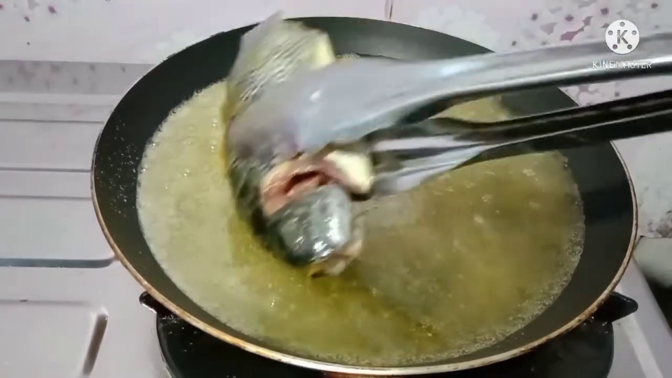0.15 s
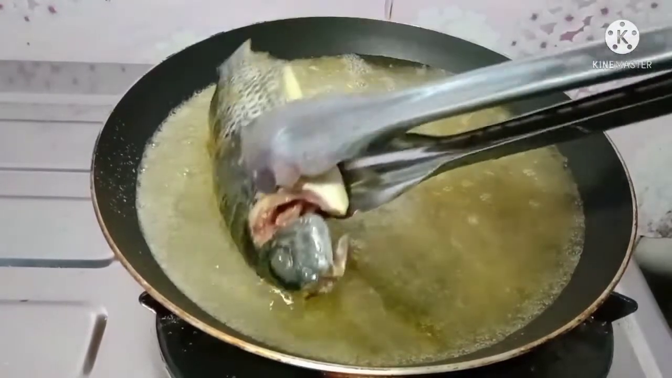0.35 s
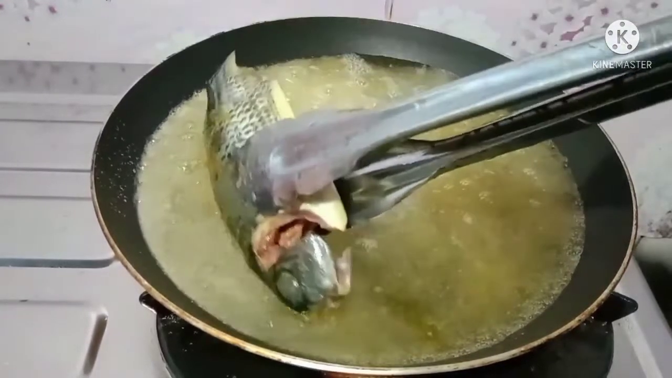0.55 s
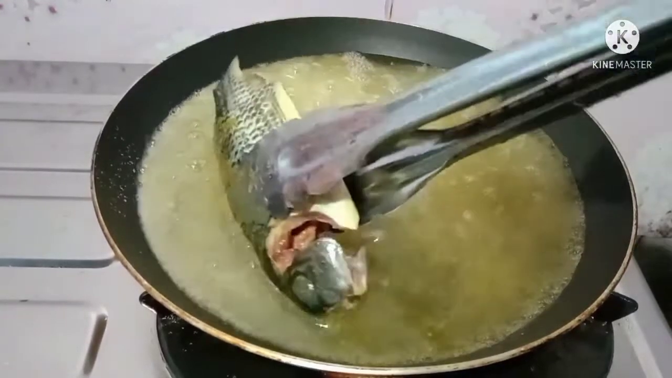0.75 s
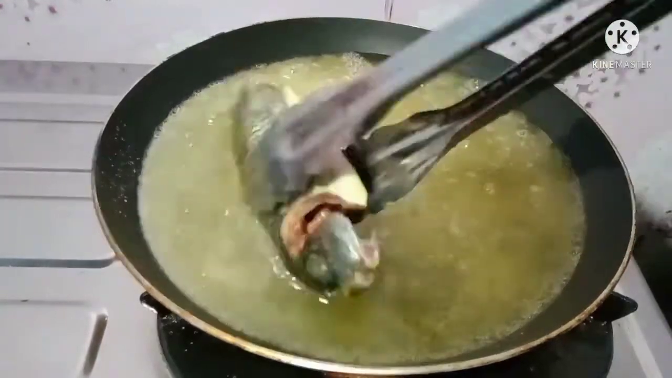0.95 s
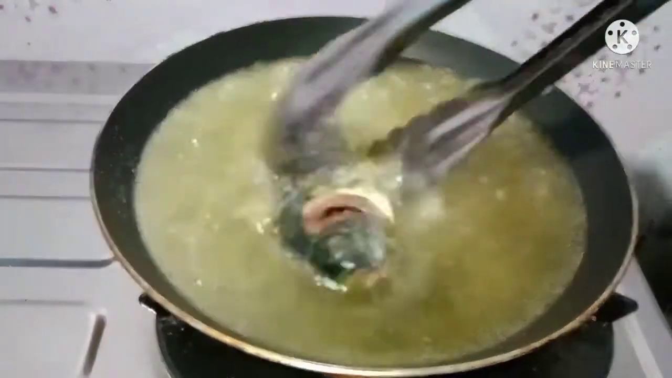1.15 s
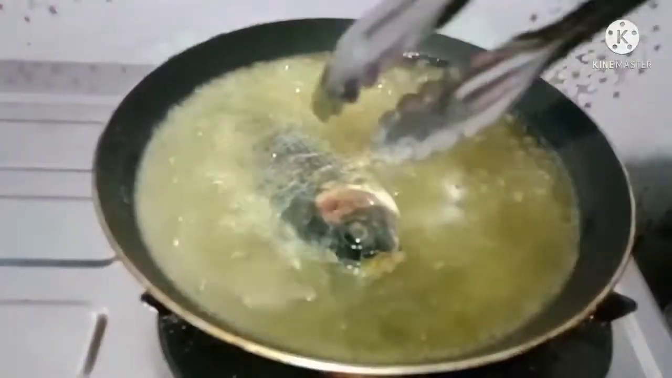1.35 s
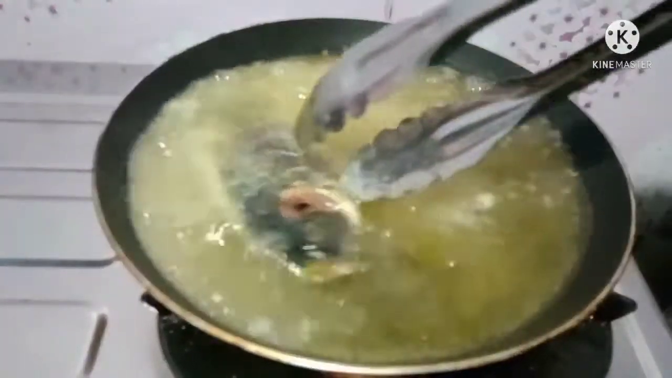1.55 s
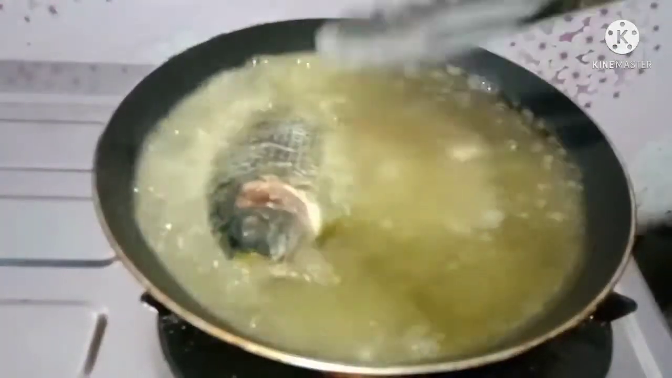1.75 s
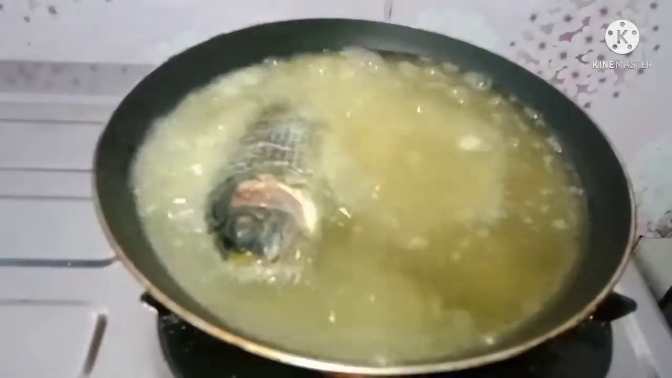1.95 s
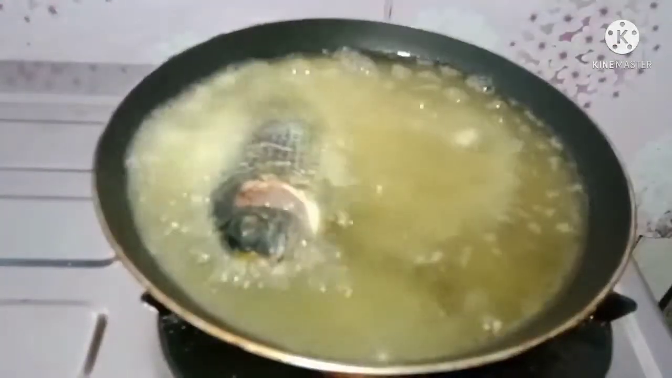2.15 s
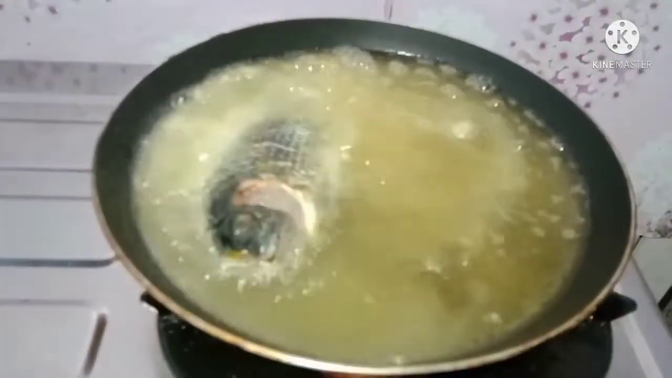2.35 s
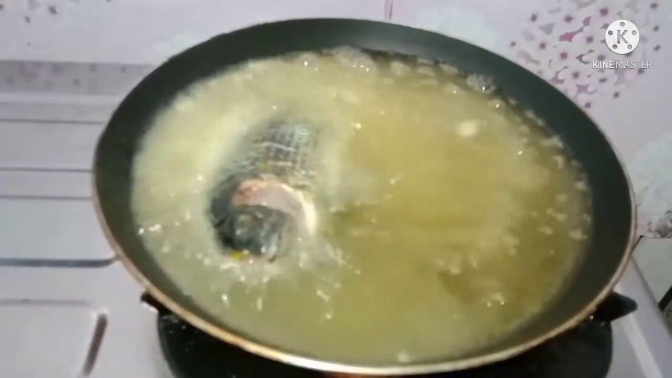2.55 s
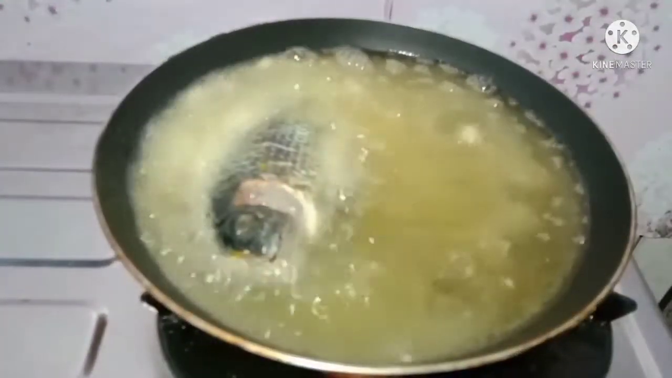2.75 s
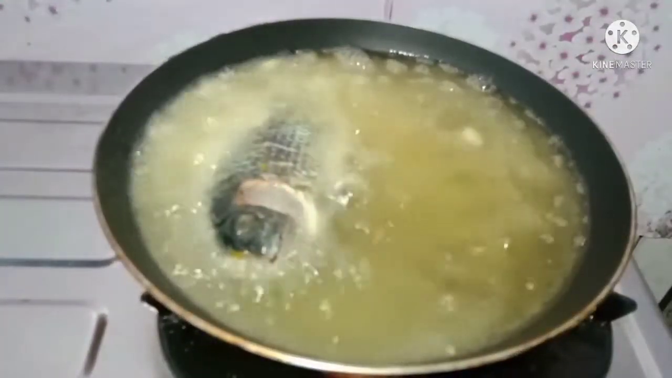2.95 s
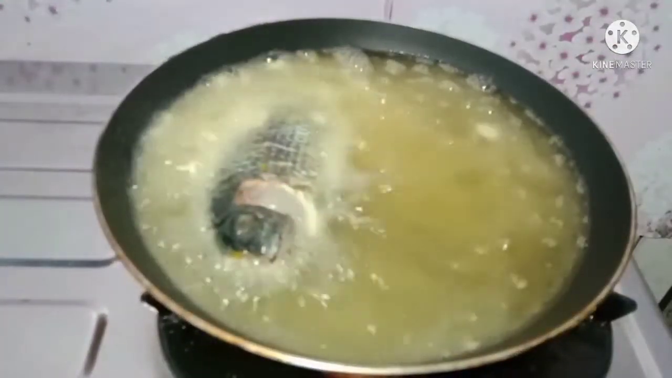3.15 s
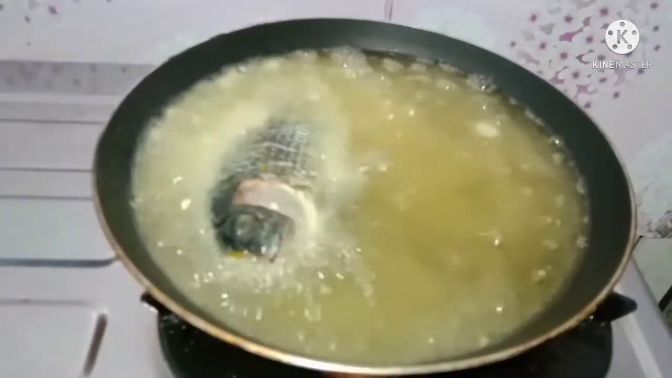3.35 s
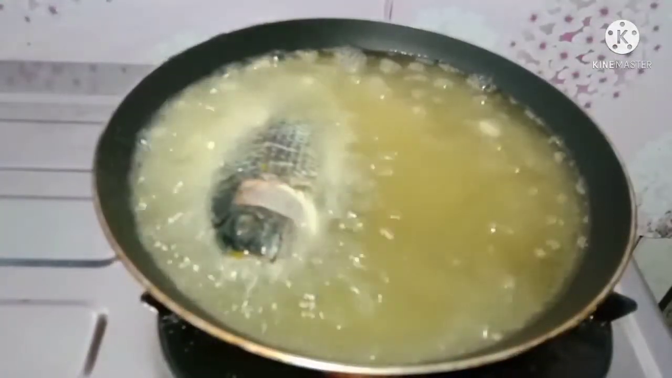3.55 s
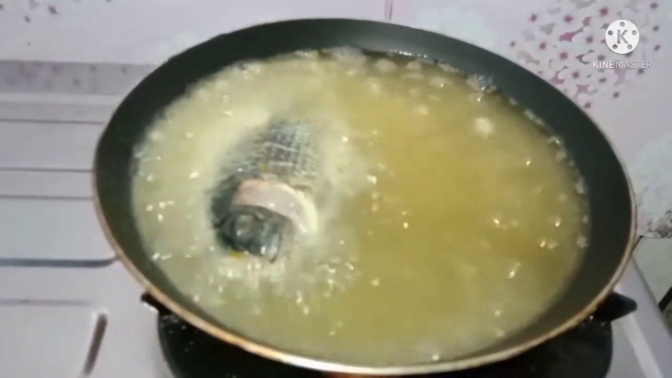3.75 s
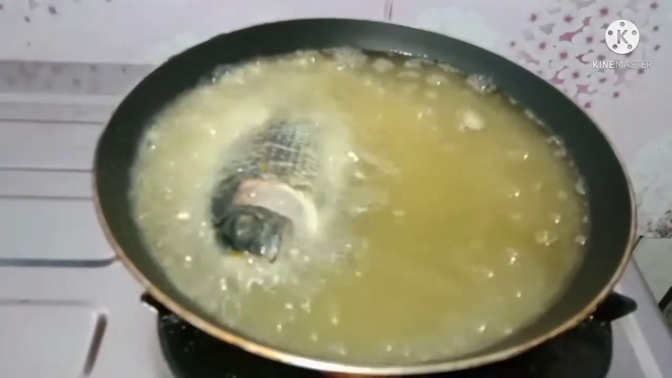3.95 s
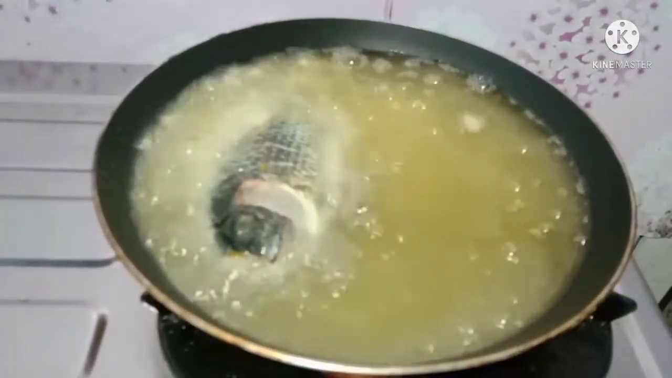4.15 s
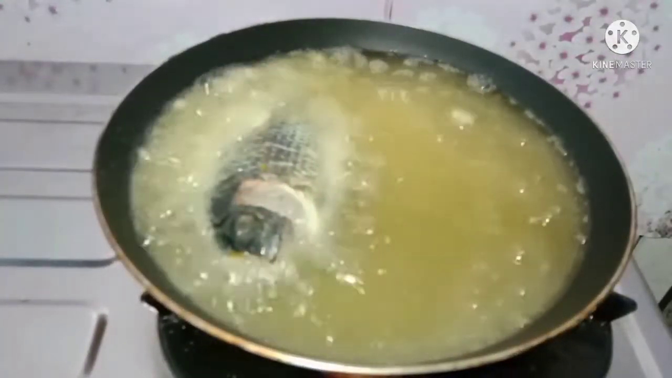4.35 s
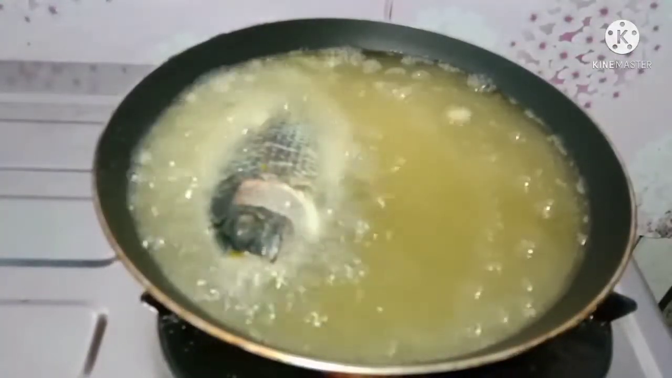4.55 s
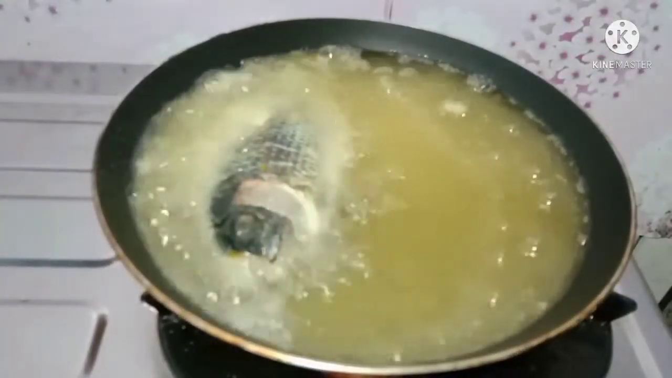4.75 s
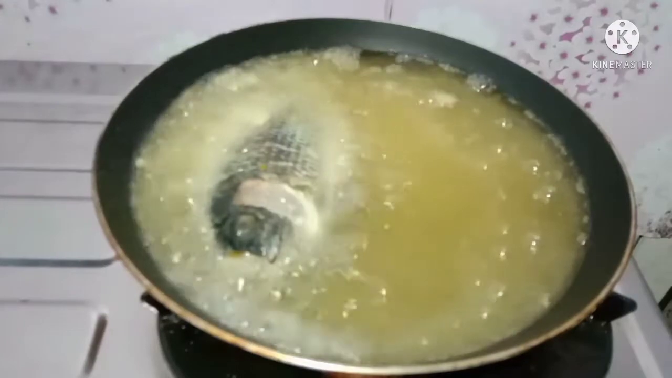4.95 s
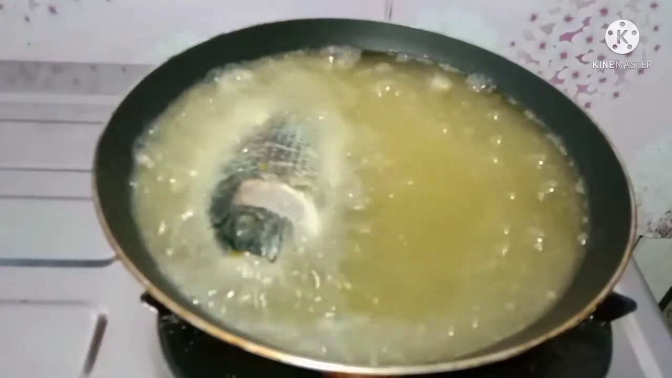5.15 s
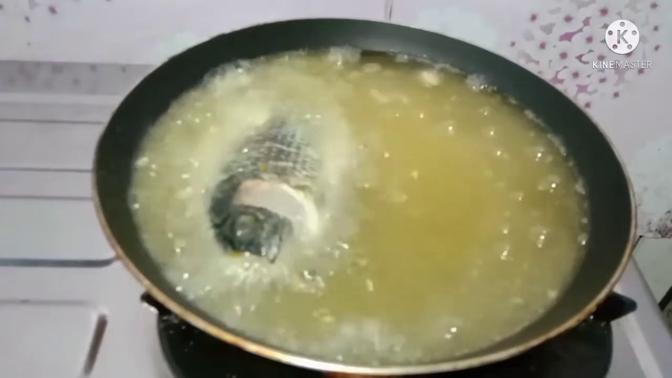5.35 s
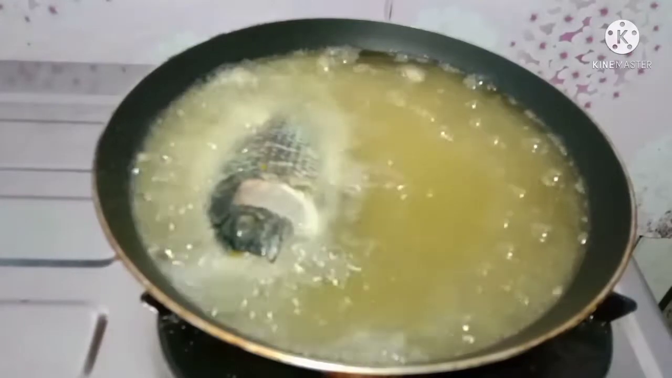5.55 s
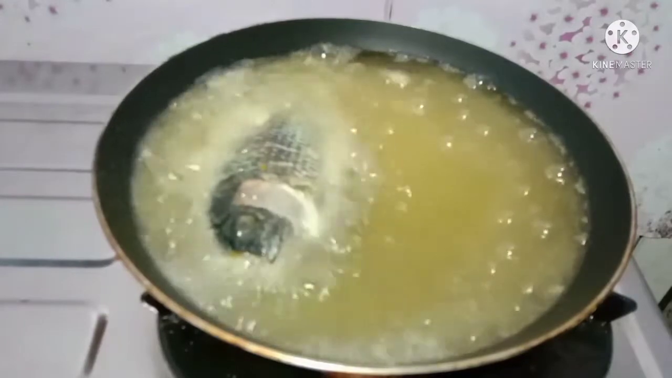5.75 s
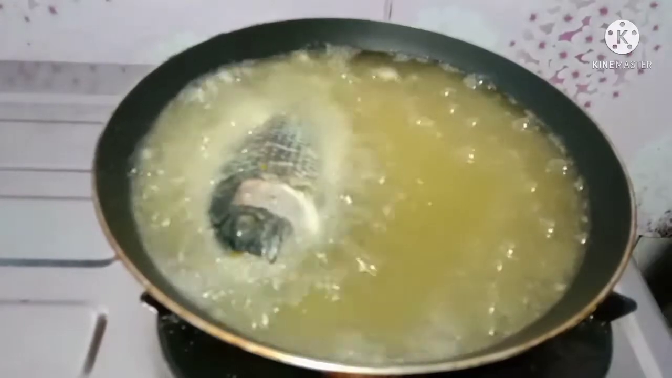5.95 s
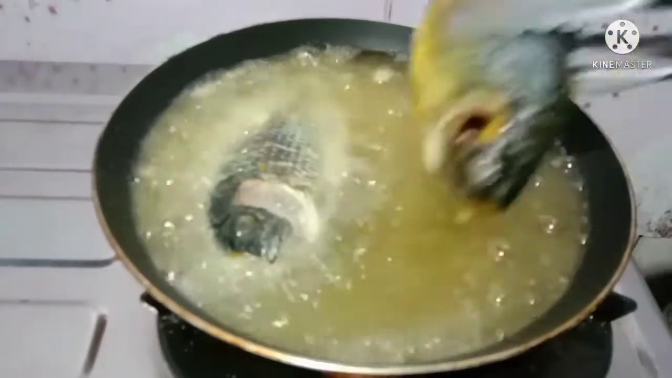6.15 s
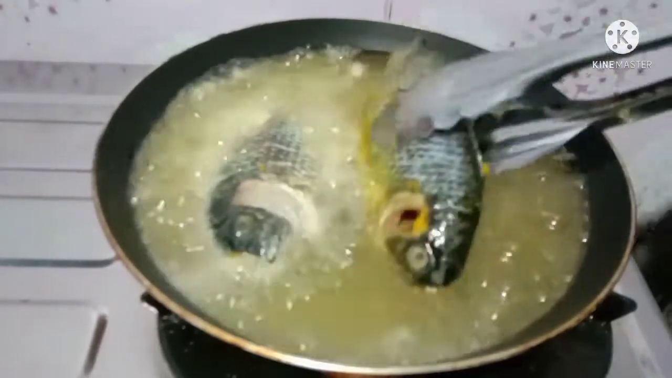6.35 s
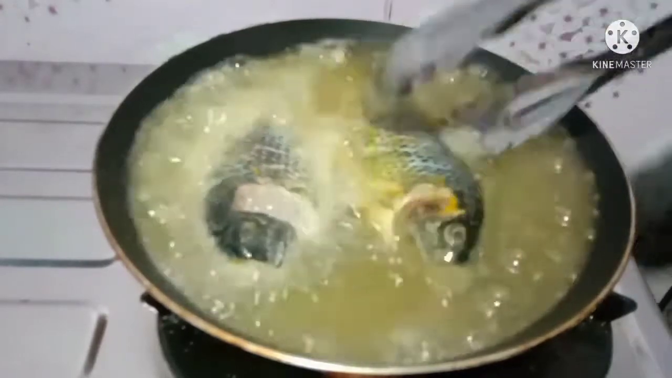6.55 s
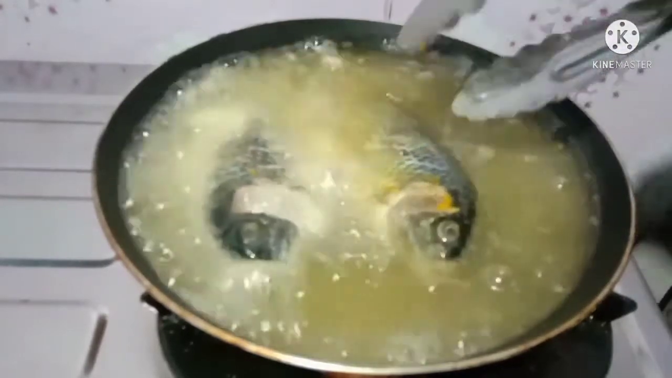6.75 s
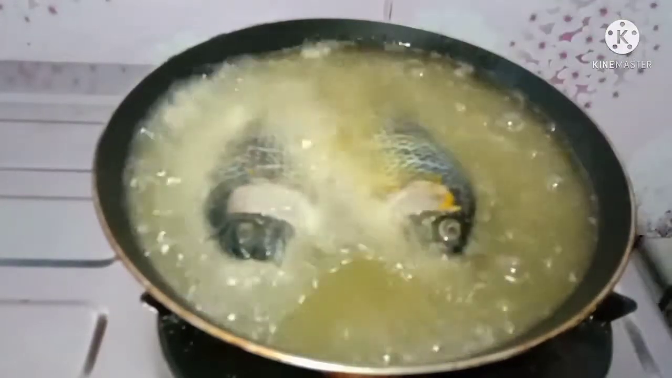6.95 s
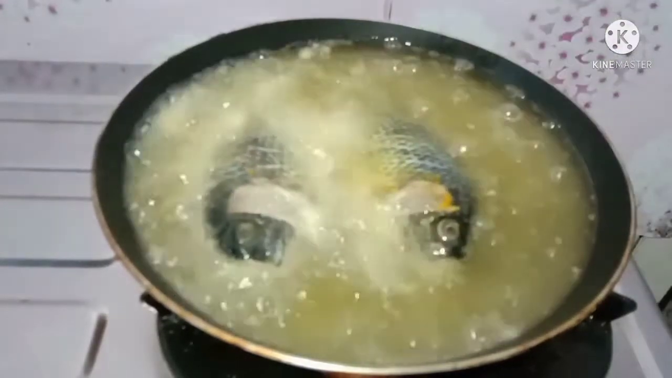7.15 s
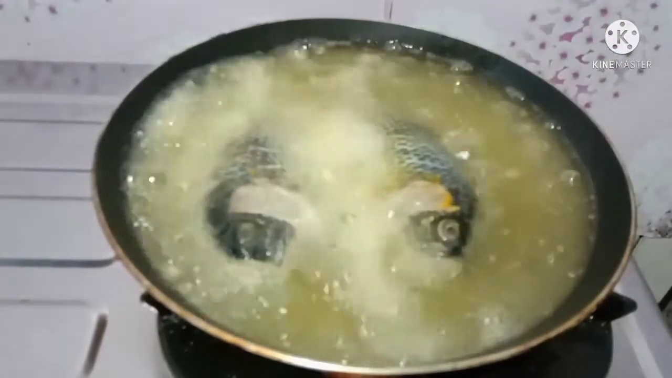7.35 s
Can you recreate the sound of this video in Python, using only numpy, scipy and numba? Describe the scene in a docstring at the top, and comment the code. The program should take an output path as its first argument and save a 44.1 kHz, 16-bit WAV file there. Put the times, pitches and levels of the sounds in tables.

```python
"""At a gas stove, close up: a fish goes into a pan of hot oil. Two scenes, mono.
First, soft low bumps sound, the gas hisses and the wet skin starts to tick and fizz.
Then steam bubbles of all sizes burst in a steady sizzle, oil spits, bigger pops ring the pan
and a faint hum stays underneath. Each bubble is a decaying sine that rises a little in pitch."""
import sys
import numpy as np
from scipy import signal
from scipy.fft import rfft, irfft, next_fast_len
from scipy.io import wavfile
from scipy.ndimage import uniform_filter1d
from numba import njit

SR = 44100
rng = np.random.default_rng(int(sys.argv[2]) if len(sys.argv) > 2 else 0)


def bounce(signal):
    """Save signal as a 16-bit WAV file at the path given by the first command-line argument."""
    frames = np.transpose(np.atleast_2d(signal))
    limited = np.clip(frames, -1, 1)
    pcm = np.round(limited * 32767).astype(np.int16)
    wavfile.write(sys.argv[1], SR, pcm)


N = 325899
TIME_S = np.arange(N) / SR
SCENE_CHANGE_S = 0.873

# six bubble sizes, fine to coarse: low_hz, high_hz, base_cycles, scatter_db, clump_db
BUBBLE_SIZES = [(9130, 15800, 14, 2.25, -0.1), (4986, 9120, 15.4, 1.5, 1), (2900, 4800, 14, 0.5, 0.8),
                (1910, 3000, 21.5, 1, 1.2), (783, 2010, 24, 1.1, 1.07), (428, 800, 18, 2, 3.5)]
# like-sized bubbles boil up: centre_s, lift_db, centre_hz, half_length_s
SURGES = [(.495, 4, 3000, .012), (0.5, 14, 13000, .03), (.55, 19, 3200, 0.018), (0.697, 5, 12000, 0.06),
          (0.778, 6, 3500, 0.078), (0.844, 2.5, 1100, 0.023), (0.945, 2, 6500, 0.023),
          (1.217, 2, 5500, 0.021), (1.295, 2.5, 2600, 0.14), (1.86, 5, 4800, 0.079),
          (2.012, 5, 5500, 0.011), (2.073, 5.5, 4200, 0.023), (2.177, 3, 4460, 0.021),
          (2.363, 3, 2500, 0.041), (3.15, 0, 4500, 0.026), (3.275, 4, 2500, 0.039),
          (3.997, 4.5, 2190, 0.025), (4.08, 2.5, 5500, 0.011), (4.474, 5.5, 2500, 0.025),
          (5.176, 6.5, 2180, 0.014), (6.604, 6.5, 2600, 0.011), (7.11, 4, 5070, 0.15),
          (7.276, 1, 7000, 0.022)]
# sizzle drift: time_s, fine_db, coarse_relative_db
FRY_DRIFT = [(0.96, -30, -15), (1.07, -30, -18.5), (1.3, -31, -15.5), (1.41, -29.5, -19.5),
             (2.07, -31, -16), (2.18, -29.5, -18.5), (4.18, -32, -13.5), (4.43, -33, -12),
             (5.04, -30.5, -15), (5.29, -31, -13), (6.17, -30, -15), (6.62, -31.5, -15), (7.23, -29, -14.5),
             (7.39, -28.5, -18)]
# sizzle onset per size: start_s, depth_db, rise_s, offset_db, coarse_share
FRY_ONSETS = [(0.935, 16.5, 0.0025, 0.48, 0.06), (0.905, 31, 0.016, -5, 0.38),
              (0.99, 10, 0.014, -9.5, 0.91), (0.91, 9, .012, -6, 1), (0.92, 4, .012, -8.5, 1),
              (1, 22, .03, -28, 0.91)]
# sizzle spectrum: freq_hz, gain_db
FRY_SPECTRUM = [(260, -52), (450, -29.5), (1110, -23.5), (1270, -17), (1410, -21), (1560, -14.5),
                (2400, -13.5), (2620, -15.5), (3270, -10), (4270, -15), (6850, -6.5), (8180, -12.5),
                (11200, 1.5), (13500, -6.5), (15500, -17)]
# sizzle drops and creeps back: start_s, gain_db, recovery_s
LULLS = [(1.965, -3, .015), (2.022, -3.5, 0.05), (3.02, -7, 0.015), (3.393, -10, 0.013),
         (4.03, -3.5, 0.016), (4.43, -3, .03), (4.585, -8, 0.0066), (4.815, -7, 0.013),
         (5.574, -11.5, 0.013), (5.856, -11, 0.0086), (6.556, -5, 0.029)]
# sharp oil spits: start_s, level_db, pitch_hz
SPITS = [(.8725, -29, 11600), (0.9407, -32, 7300), (0.9897, -15, 6820), (1.108, -21, 7250),
         (1.222, -15, 7160), (1.319, -24, 6780), (1.4364, -15.5, 7000), (1.5404, -19, 7000),
         (1.598, -20, 6980), (1.7309, -20, 5450), (1.767, -23, 7300), (1.8347, -21, 7210),
         (1.9385, -22, 5560), (2.0412, -31, 6500), (2.058, -18, 6660), (2.37, -21, 7130),
         (2.671, -25, 7140), (2.762, -20, 6100), (3.1644, -23, 7300), (3.3148, -25, 6090),
         (3.4989, -20, 6830), (3.5403, -22, 7340), (3.594, -20, 5640), (3.672, -20, 6660),
         (4.1906, -37, 6730), (4.9736, -20, 7350), (5.3003, -31, 6100), (5.3585, -14, 9050),
         (5.469, -18, 7330), (5.5847, -24, 7630), (5.6515, -24, 7340), (5.778, -17, 6800),
         (6.3794, -23, 7820), (6.605, -28, 3720), (7.024, -19, 6530), (7.0514, -32, 6790),
         (1.3959, -17, 11700), (1.9417, -15, 11900), (2.455, -22, 6500), (2.497, -27, 7500),
         (2.629, -19, 9000), (2.715, -17, 9000), (2.784, -31, 7000), (4.5777, -19, 10700),
         (5.4492, -29, 11000), (5.903, -22, 7000)]
# deeper pops: start_s, base_db, pitch_hz
POPS = [(0.986, -28, 2440), (1.286, -21.5, 2460), (1.5536, -25, 2400), (1.5916, -27, 2670),
        (1.865, -24, 2480), (1.916, -28, 2690), (1.9785, -16.5, 2520), (2.197, -28, 2780),
        (2.73, -27, 2860), (2.76, -24, 2600), (3.097, -28.5, 2600), (3.1416, -29, 2460), (3.448, -25, 2760),
        (3.546, -22, 3140), (3.664, -22, 2720), (3.726, -28, 2720), (3.7647, -23, 2680),
        (3.788, -24.5, 2560), (4.0013, -25, 1860), (4.47, -29, 2680), (4.5195, -24, 2000),
        (5.135, -27, 2700), (5.1675, -22.5, 2490), (5.3006, -24.5, 2780), (5.3785, -25, 2530),
        (5.4166, -29, 2550), (5.4575, -23.5, 2250), (5.563, -21.5, 2680), (5.644, -32, 2410),
        (5.949, -32, 2700), (6.093, -28, 2580), (6.275, -25.5, 2240), (6.307, -25, 2340),
        (6.329, -25, 2500), (6.36, -33, 2500), (6.4542, -22, 2340), (6.461, -24.5, 2330),
        (6.55, -26.5, 2630), (6.5915, -28, 1980), (6.606, -26, 1950), (6.648, -26.5, 1910),
        (4.0587, -31, 2620), (5.61, -29, 2960), (5.7144, -33, 2950), (5.897, -27, 1900),
        (6.8987, -26, 2360), (7.017, -28, 1800), (7.1966, -33, 2600), (7.272, -30, 2400)]
# large bubbles: start_s, level_db, pitch_hz
GURGLES = [(1.985, -49, 824), (2.479, -55, 1060), (2.76, -43, 1130), (3.424, -55, 820), (3.45, -56, 396),
           (3.764, -46, 1080), (3.953, -45, 1020), (3.978, -51, 850), (4.469, -47, 1090),
           (4.508, -50, 1040), (5.136, -54, 638), (5.318, -54, 770), (5.37, -48, 990), (5.713, -52, 880),
           (6.324, -49, 835), (6.387, -50, 820), (6.461, -57, 845), (7.039, -55, 610), (7.169, -58, 1040)]
# pan resonances: centre_hz, width_hz, lift_db
PAN_MODES = [(823, 38, 4), (2100, 126, 1.5), (3720, 50, 4.5), (4300, 32, 6.5), (2920, 63, 3.5),
             (3296, 53, -5.5), (11370, 320, -0.5), (11360, 200, -4.5), (13140, 370, 4.5),
             (13650, 250, -0.5)]
# main pan ring, sinking as the oil settles: time_s, pitch_hz, lift_db
PAN_MAIN_MODE = [(.9, 2720, 7.5), (1.6, 2640, 10.5), (2.15, 2680, 9.5), (2.4, 2680, 11.5), (3.0, 2616, 11),
                 (3.6, 2690, 7.5), (4.4, 2600, 9.5), (5.4, 2640, 6), (6.2, 2620, 8), (7.39, 2570, 4.5)]
# first fizz per size: start_s, depth_db, rise_s, full_db
TOUCH_ONSETS = [(.46, 21.5, 0.19, -49), (.46, 32, 0.069, -50), (.47, 47, 0.17, -50), (.58, 36, 0.13, -51),
                (.63, 35, 0.04, -50.5), (.72, 37, 0.028, -57.5)]
# first fizz spectrum: freq_hz, gain_db
TOUCH_SPECTRUM = [(260, -70), (450, -46), (587, -16), (701, -21), (916, -5), (1650, -7), (2260, -21),
                  (2470, -13), (2620, -17), (2950, -11), (5490, -11), (6650, -11.5), (7710, -27),
                  (11500, -29), (13600, -29), (14400, -14), (15500, -11.5)]
# wet skin ticks: start_s, base_db, pitch_hz, edge_db, edge_hz
TICKS = [(0.4728, -51, 6450, -51, 10500), (.489, -61, 3300, -60, 6000), (0.4956, -44, 5700, -40, 11500),
         (0.5266, -43, 5630, -40, 15000), (0.544, -37.5, 5430, -43, 11000), (0.587, -38, 5100, -55, 14300),
         (0.631, -41, 5140, -36, 12500), (0.6824, -46, 5660, -40, 14400), (0.7018, -43, 6590, -40, 9500),
         (0.728, -40, 5700, -42, 13200), (0.761, -32, 5630, -33, 9200), (0.772, -32, 5940, -48, 14200),
         (0.8114, -38.5, 6450, -39, 8600), (0.8647, -31, 5860, -42, 11500)]
# gas hiss spectrum: freq_hz, gain_db
GAS_SPECTRUM = [(240, -14), (400, -3), (425, -16), (913, -7), (1870, -17.5), (2020, -2), (2180, -28),
                (3450, -17), (4150, -39), (5720, 5.5), (8520, -14), (12500, -27), (15500, 0)]
# soft bumps: peak_s, level_db, pitch_hz, rise_s, fade_s
BUMPS = [(.004, -46.5, 190, 0.022, 0.006), (.025, -51, 150, 0.01, 0.013), (.012, -54.5, 290, 0.028, 0.016),
         (.015, -64, 495, 0.0097, 0.013), (.085, -59, 70, 0.025, 0.036), (0.129, -72, 335, 0.047, 0.059),
         (.186, -63, 115, .02, 0.02), (.272, -53.5, 134, 0.016, 0.054), (.38, -68, 105, .02, .02),
         (.48, -62, 115, .015, .015), (.518, -57, 110, 0.019, 0.011), (.585, -59, 116, 0.013, 0.013),
         (.645, -64, 112, .012, .012), (.7, -67, 122, .014, 0.014), (.758, -61, 108, 0.024, 0.026),
         (.858, -65, 115, 0.013, .014)]
# rumble spectrum: freq_hz, gain_db
RUMBLE_SPECTRUM = [(15, -52), (25, -23), (43, -17), (128, -4), (207, -10), (263, -20), (339, -26),
                   (403, -29), (430, -25), (600, -27), (780, -37), (1320, -120)]
# low noise swells: peak_s, level_db, fade_s
LOW_SWELLS = [(.93, -83, 0.058), (1.13, -73, 0.034), (1.95, -74, .015), (2.49, -72, 0.022),
              (2.75, -72, 0.029), (3.14, -79, 0.023), (3.27, -71, 0.015), (3.45, -73, 0.021),
              (3.53, -78, 0.19), (3.98, -71, 0.04), (4.31, -72, 0.035), (4.45, -64, 0.01),
              (4.53, -76, 0.14), (5.13, -66, 0.015), (5.29, -73, .06), (5.43, -70, .035), (5.86, -78, 0.03),
              (5.92, -75, 0.095), (6.33, -65, 0.051), (7.04, -69, 0.026), (7.17, -66, 0.064),
              (7.38, -81, 0.046)]
# low noise spectrum: freq_hz, gain_db
LOW_NOISE_SPECTRUM = [(15, -41), (30, -9), (48, -13), (80, -12), (165, -6), (199, 0.5), (227, -4.5),
                      (387, -1.5), (512, -8.5), (600, -12), (780, -13), (1320, -120)]


def sizzle():
    """Steam bubbles and crackle ring the pan, with drift, surges and lulls."""
    fine_db, coarse_db = follow(FRY_DRIFT)
    levels_db = [fine_db + share * coarse_db + offset_db + onset_db(*onset)
                 for *onset, offset_db, share in FRY_ONSETS]
    lull_db = sum(db * (TIME_S > start_s) * np.exp(-np.abs(TIME_S - start_s) / recovery_s)
                  for start_s, db, recovery_s in LULLS)
    return pan_ring(fizz(levels_db, FRY_SPECTRUM) + crackle()) * undb(lull_db)


def fizz(levels_db, spectrum):
    """One swarm per bubble size, each with its own level and surges."""
    mix = sum(undb(db + surge_db(*size[:2])) * unit(colour(swarm(*size), spectrum))
              for size, db in zip(BUBBLE_SIZES, levels_db))
    return undb(0.46 * walk(14)) * mix


def swarm(low_hz, high_hz, base_cycles, scatter_db, clump_db):
    """Random bubbles in clumps, a few much larger; countless finer ones merge into hiss."""
    rate_per_s = 1.5 * max(round(high_hz - low_hz, -3), 500)
    pitch, strength, when, length = rng.random((int(rate_per_s * N / SR), 4)).T
    hz = low_hz + (high_hz - low_hz) * pitch
    gain = np.sqrt(hz) * undb(scatter_db * np.minimum(-np.log(1 - strength), 6))
    # a spot of skin briefly spits like-sized bubbles: pitch x time patches
    patch_db = 2.6 * rng.standard_normal((24, 250))
    gain *= undb(patch_db[(24 * pitch).astype(int), (250 * when).astype(int)])
    cycles = base_cycles * (0.5 + 3.7 * length ** 4)
    bubbles = ring_bubbles((when * N).astype(np.int64), hz, cycles, gain, glide=0.1)
    hiss = signal.sosfilt(bandpass(low_hz, high_hz), rng.standard_normal(N))
    return (unit(bubbles) + 0.72 * unit(hiss)) * undb(clump_db * walk(20))


@njit
def ring_bubbles(start_sample, hz, cycles, gain, glide):
    """Each bubble swells for one cycle and dies 60 dB over its cycles; glide raises its pitch."""
    out = np.zeros(N)
    for k, start in enumerate(start_sample):
        samples = int(cycles[k] * SR / hz[k])
        decay = 1000. ** (-1. / samples)
        phase, step, amplitude = 0., 2 * np.pi * hz[k] / SR, gain[k]
        for i in range(start, min(start + samples, N)):
            out[i] += amplitude * np.sin(phase) * min(phase / (2 * np.pi), 1.)
            phase += step
            step *= 1 + glide / samples
            amplitude *= decay
    return out


def surge_db(low_hz, high_hz):
    """Lift of one bubble size, greatest from surges near its pitch."""
    centre_s, lift_db, centre_hz, half_length_s = np.transpose(SURGES)
    octaves = np.log2(np.sqrt(low_hz * high_hz) / centre_hz)
    return (lift_db * np.exp(-octaves ** 2)) @ bell(centre_s[:, None], half_length_s[:, None])


def crackle(rate_per_s=260, cycles=7.):
    """Dry high snaps, most small, a few sharp."""
    pitch, strength, when = rng.random((int(rate_per_s * N / SR), 3)).T
    hz = 4500 * 3 ** pitch
    gain = (hz / 5000) ** -0.16 * undb(3 * np.minimum(-np.log(1 - strength), 3.5))
    snaps = ring_bubbles((when * N).astype(np.int64), hz, np.full(len(hz), cycles), gain, glide=0.)
    level_db = -49.5 + onset_db(start_s=0.84, depth_db=14, rise_s=0.025)
    return undb(level_db) * unit(colour(snaps, FRY_SPECTRUM))


def bursts(start_s, level_db, pitch_hz, cycles, spray_db, drops=5, spray_s=0.0072):
    """Single bubbles, each trailed by a spray of smaller drops."""
    delay, detune = rng.random((len(start_s), drops, 2)).T
    starts = (np.vstack([start_s, start_s + spray_s * delay]).ravel() * SR).astype(np.int64)
    hz = np.vstack([pitch_hz, pitch_hz * (0.885 + 0.43 * detune)]).ravel()
    gain = undb(np.concatenate([level_db, np.tile(level_db + spray_db, drops)]))
    return ring_bubbles(starts, np.minimum(hz, 0.4 * SR), np.resize(cycles, len(hz)), gain, glide=0.025)


def spits():
    """Oil spits in sharp, high bursts."""
    return bursts(*np.transpose(SPITS), cycles=22, spray_db=-11)


def pops():
    """A dry crack, then a brief ring of the pan; louder pops ring longer."""
    start_s, base_db, hz = np.transpose(POPS)
    crack = bursts(start_s, base_db - 2, 1.27 * hz, cycles=4.7, spray_db=-15)
    cycles = 12 * undb(0.2 * (base_db + 34.5))
    body = bursts(start_s, base_db - 4.5, hz, cycles, spray_db=-13)
    return pan_ring(body) + crack


def pan_ring(x, main_width_hz=95, waver_hz=30):
    """The pan lifts or dips narrow bands of what bursts in it; its main mode moves."""
    for hz, width_hz, lift_db in PAN_MODES:
        x = x + (undb(lift_db) - 1) * signal.lfilter(*signal.iirpeak(hz, hz / width_hz, SR), x)
    main_hz, main_db = follow(PAN_MAIN_MODE)
    # moving band-pass: shift to 0 Hz, low-pass, shift back
    carrier = np.exp(2j * np.pi * np.cumsum(main_hz + waver_hz * walk(9)) / SR)
    pole = np.exp(-np.pi * main_width_hz / SR)
    band = 2 * np.real(carrier * signal.lfilter([1 - pole], [1, -pole], x / carrier))
    return x + (undb(main_db + walk(12)) - 1) * band


def gurgles():
    """Single large bubbles come up."""
    return bursts(*np.transpose(GURGLES), cycles=31, spray_db=-11)


def skin_fizz():
    """Wet skin meets the oil; the fizz spreads from fine to coarse bubbles."""
    return fizz([full_db + onset_db(*onset) for *onset, full_db in TOUCH_ONSETS], TOUCH_SPECTRUM)


def skin_ticks():
    """First ticks of wet skin: a sharp snap, a spit and a bright edge."""
    start_s, base_db, hz, edge_db, edge_hz = np.transpose(TICKS)
    snap = bursts(start_s, base_db - 2, hz, cycles=8., spray_db=-20)
    spit = bursts(start_s, base_db - 0.5, hz, cycles=66., spray_db=-5)
    edge = bursts(start_s, edge_db, edge_hz, cycles=24., spray_db=-5)
    return snap + spit + edge


def gas_hiss():
    """Gas hisses at a flickering level."""
    return undb(-60.5 + 2.8 * walk(16.4)) * unit(colour(rng.standard_normal(N), GAS_SPECTRUM))


def bumps_and_rumble():
    """Faint low noise; each bump is a short soft tone plus a swell of that noise."""
    noise = unit(colour(rng.standard_normal(N), RUMBLE_SPECTRUM))
    out = undb(-71 + 1.9 * walk(19.1)) * noise
    for peak_s, db, hz, rise_s, fade_s in BUMPS:
        fade = np.exp(-np.abs(TIME_S - peak_s) / fade_s)
        envelope = np.where(TIME_S < peak_s, bell(peak_s, rise_s), fade)
        tone = np.sqrt(2) * np.sin(2 * np.pi * (hz * TIME_S + rng.random()))
        out += undb(db) * envelope * (tone + 0.29 * noise)
    return out


def low_noise(rise_s=0.021):
    """Low noise swells and fades; its deepest band flickers on and off at random."""
    noise = unit(colour(rng.standard_normal(N) * undb(2.6 * walk(22)), LOW_NOISE_SPECTRUM))
    deep = signal.sosfiltfilt(bandpass(42, 148), noise)
    deep_db = np.minimum(-2 + 8 * walk(13), 4)
    noise += (undb(deep_db) - 1) * deep
    peak_s, level_db, fade_s = np.transpose(LOW_SWELLS)
    since_s = TIME_S - peak_s[:, None]
    swells = undb(level_db) @ np.exp(np.where(since_s < 0, since_s / rise_s, -since_s / fade_s[:, None]))
    return (undb(-76 + 2 * walk(6.7)) + swells) * noise


def hum(pitch_hz=199.2):
    """A faint tone wavers in level and swells once."""
    level_db = -86.5 + 23 * bell(centre_s=0.92, half_length_s=0.037) + 2 * walk(21)
    return np.sqrt(2) * undb(level_db) * np.sin(2 * np.pi * pitch_hz * TIME_S)


def onset_db(start_s, depth_db, rise_s):
    """Waits depth_db down, then approaches 0 dB."""
    return -depth_db * np.exp(-np.maximum(TIME_S - start_s, 0) / rise_s)


def bell(centre_s, half_length_s):
    """Gaussian envelope, peak 1."""
    return np.exp(-((TIME_S - centre_s) / half_length_s) ** 2)


def walk(rate_hz):
    """Random levels joined by ramps, rms 1."""
    hold = int(SR / rate_hz)
    steps = np.repeat(rng.standard_normal(N // hold + 1), hold)
    return unit(uniform_filter1d(steps, hold)[:N])


def follow(curve):
    """Columns of a timed table, per sample."""
    time_s, *columns = np.transpose(curve)
    return [np.interp(TIME_S, time_s, column) for column in columns]


def colour(x, spectrum):
    """Filter by (freq_hz, gain_db) points."""
    hz, db = np.transpose(spectrum)
    size = next_fast_len(N)
    bins_hz = np.maximum(np.arange(size // 2 + 1) * SR / size, 1)
    gain = undb(np.interp(np.log(bins_hz), np.log(hz), db))
    return irfft(rfft(x, size) * gain, size)[:N]


def bandpass(low_hz, high_hz):
    return signal.butter(2, [low_hz, high_hz], "band", fs=SR, output="sos")


def undb(db):
    return 10 ** (np.asarray(db) / 20)


def unit(x):
    return x / np.sqrt(np.mean(x ** 2))


def scene(crossfade_s=0.0014):
    """The scene changes from the first touch to full frying; spits and pops on top. Both channels alike."""
    blend = np.clip((TIME_S - SCENE_CHANGE_S) / crossfade_s, 0, 1)
    touch = gas_hiss() + skin_fizz() + skin_ticks() + bumps_and_rumble()
    frying = sizzle() + low_noise() + hum() + gurgles()
    mono = (1 - blend) * touch + blend * frying + spits() + pops()
    return np.array([mono, mono])


def record(dry):
    """Steep low-pass on the top treble."""
    cutoff_hz = 15510
    return signal.sosfilt(signal.ellip(20, 0.3, 80, cutoff_hz, fs=SR, output="sos"), dry)


dry = scene()
out = record(dry)
bounce(out)
```